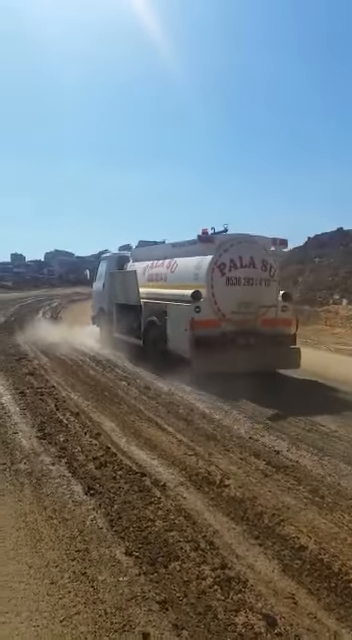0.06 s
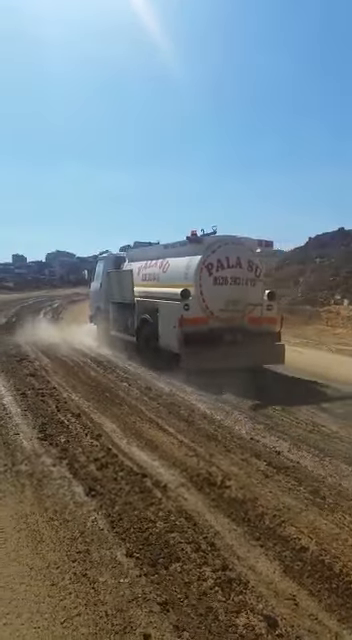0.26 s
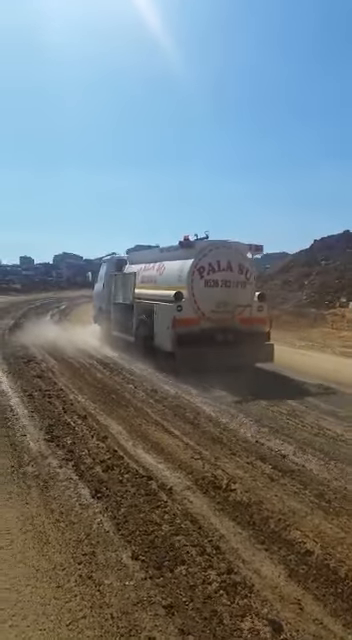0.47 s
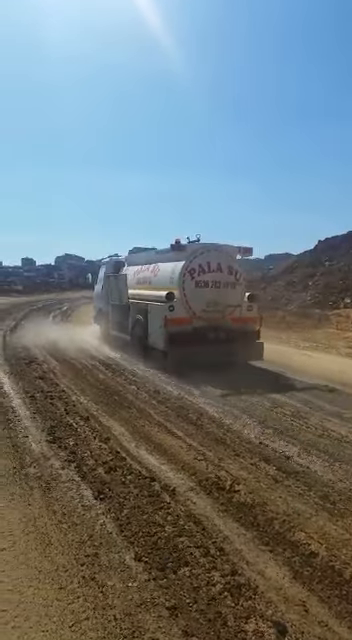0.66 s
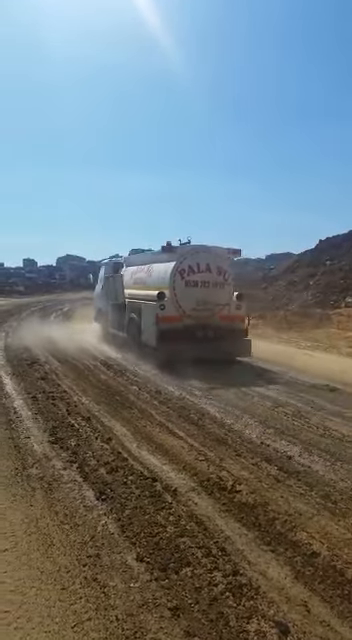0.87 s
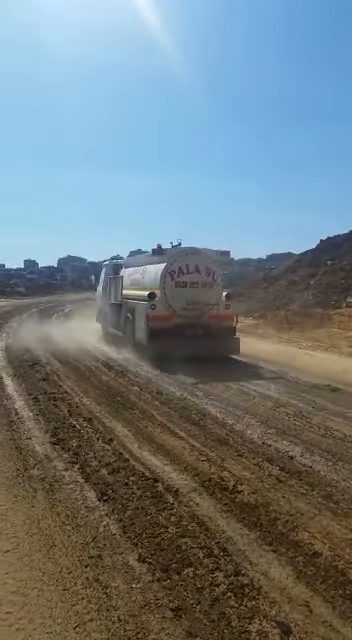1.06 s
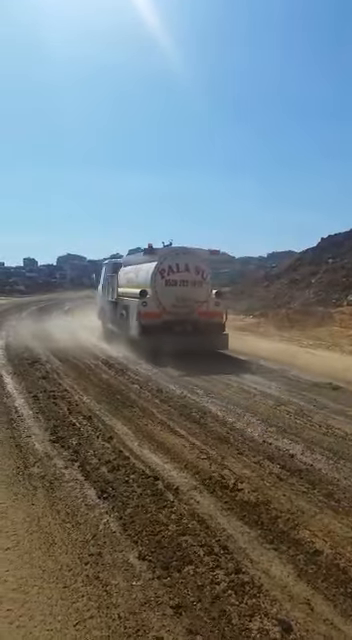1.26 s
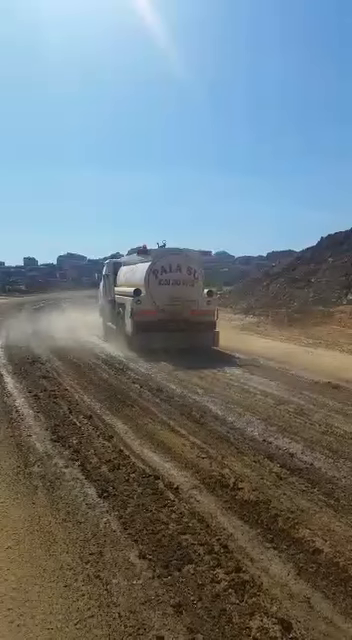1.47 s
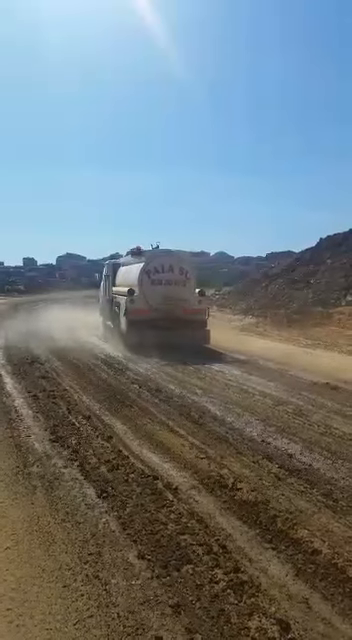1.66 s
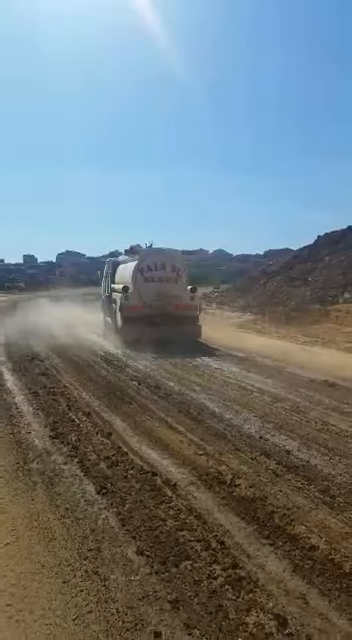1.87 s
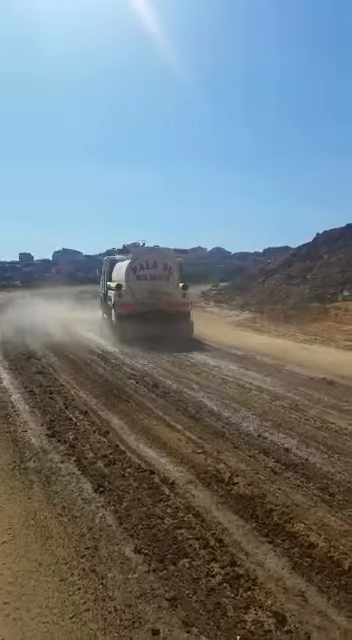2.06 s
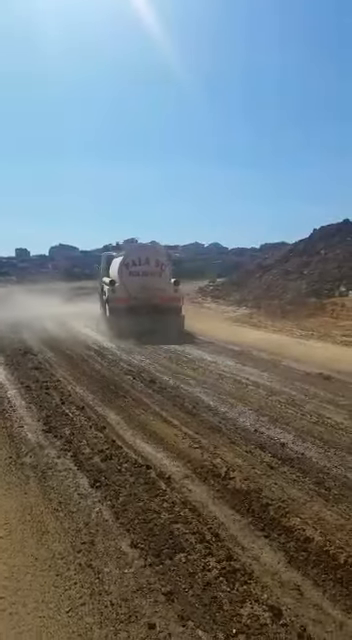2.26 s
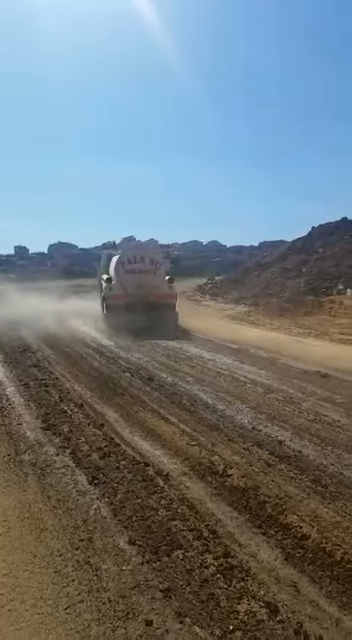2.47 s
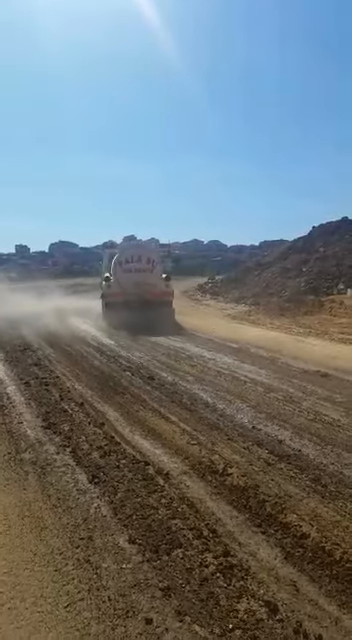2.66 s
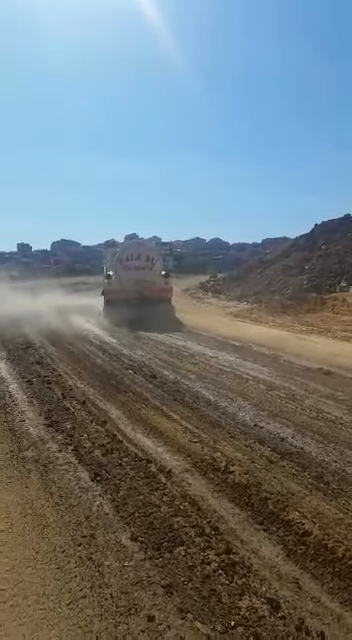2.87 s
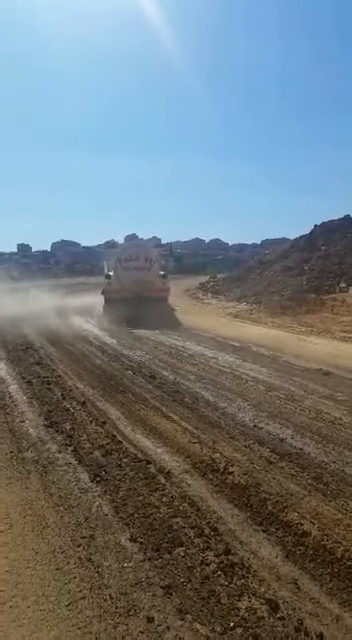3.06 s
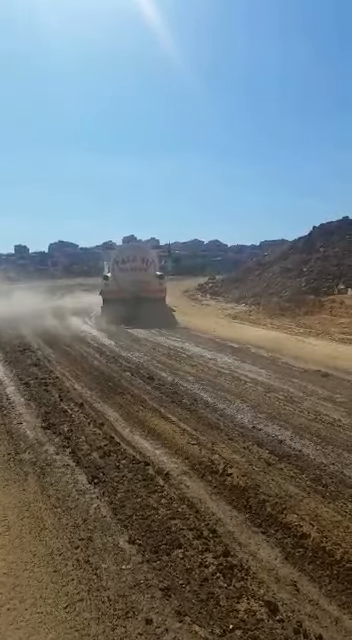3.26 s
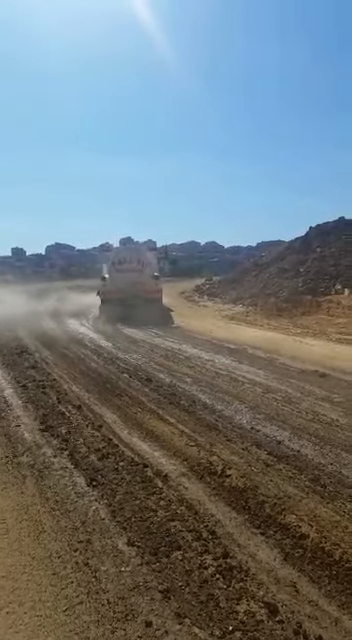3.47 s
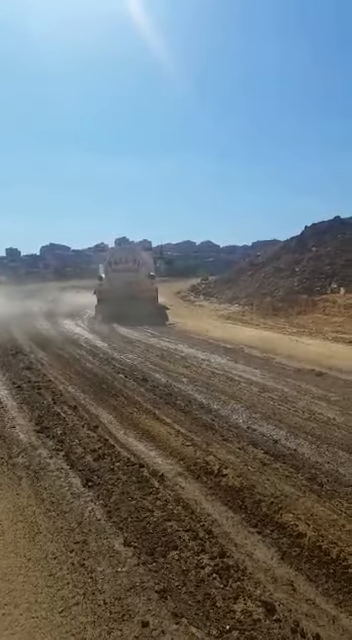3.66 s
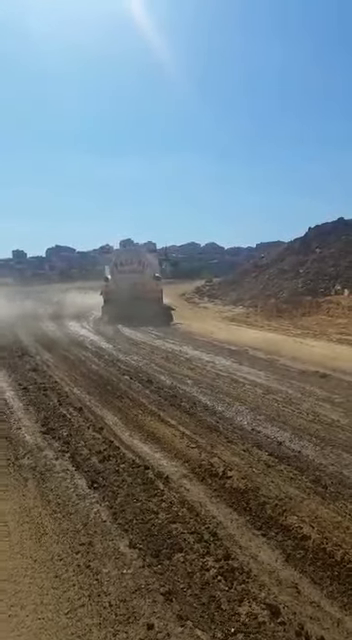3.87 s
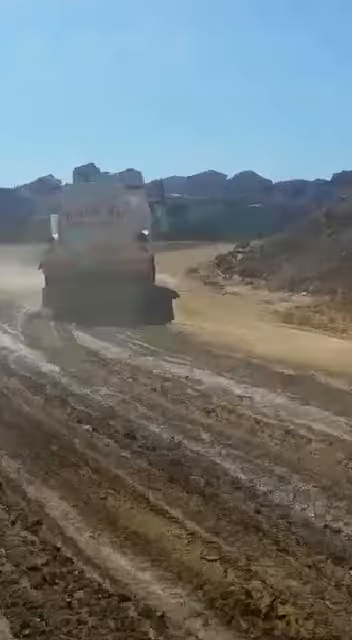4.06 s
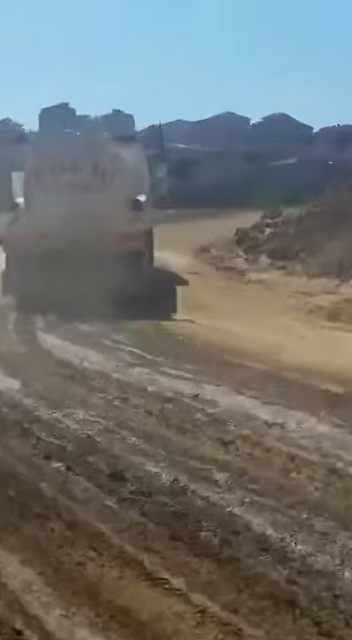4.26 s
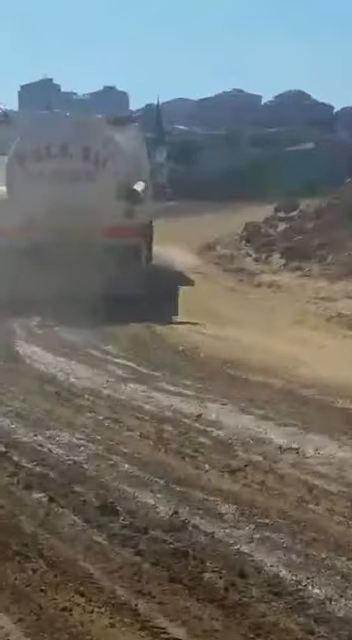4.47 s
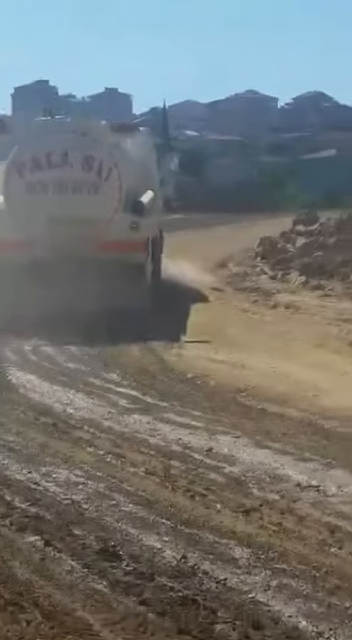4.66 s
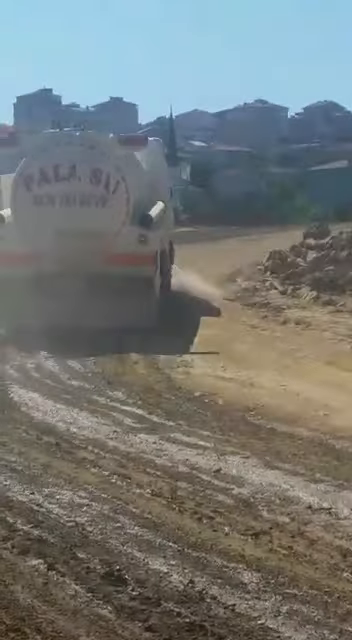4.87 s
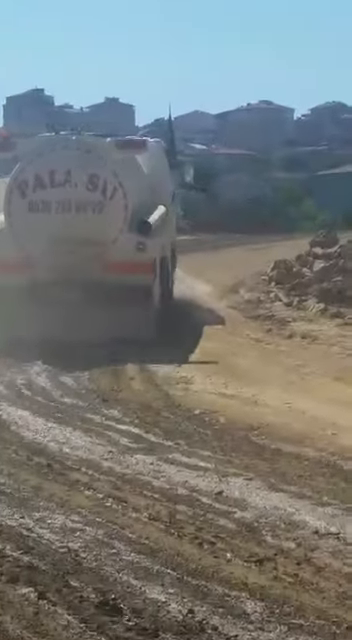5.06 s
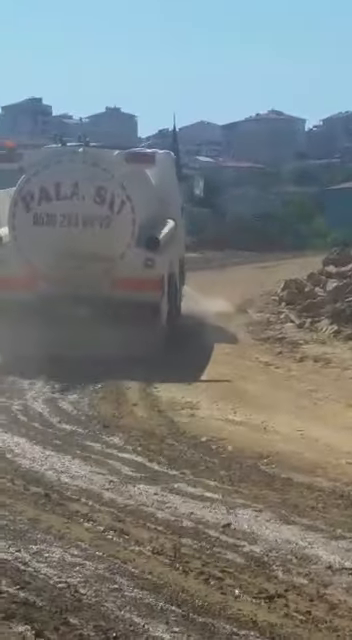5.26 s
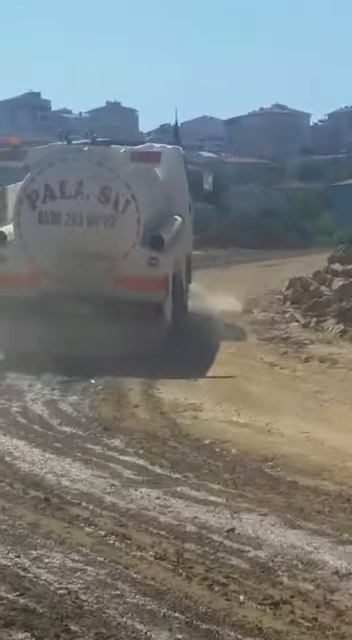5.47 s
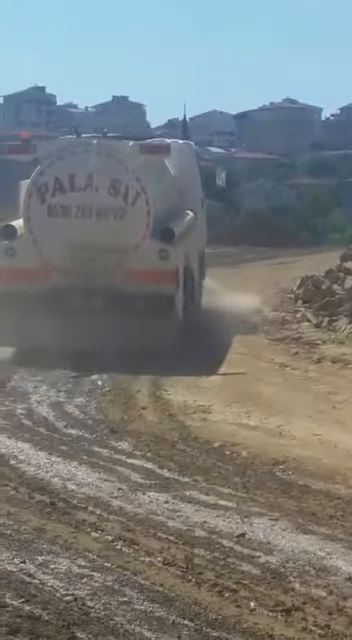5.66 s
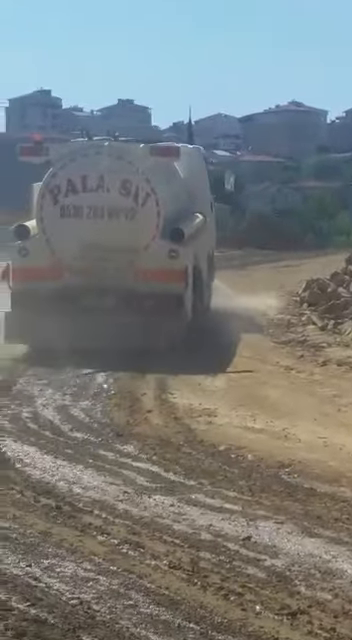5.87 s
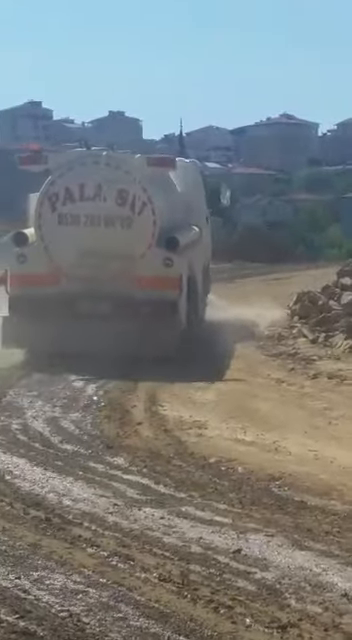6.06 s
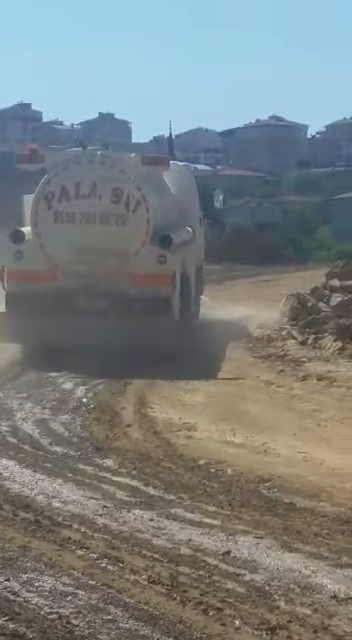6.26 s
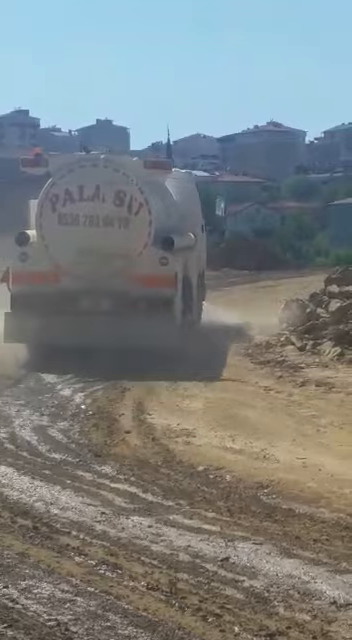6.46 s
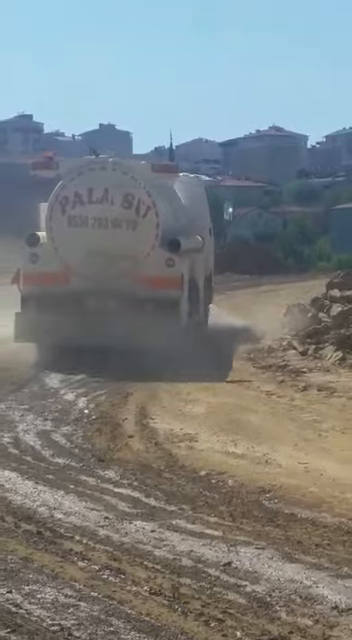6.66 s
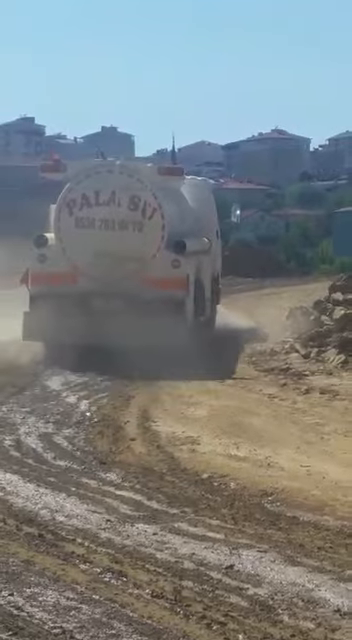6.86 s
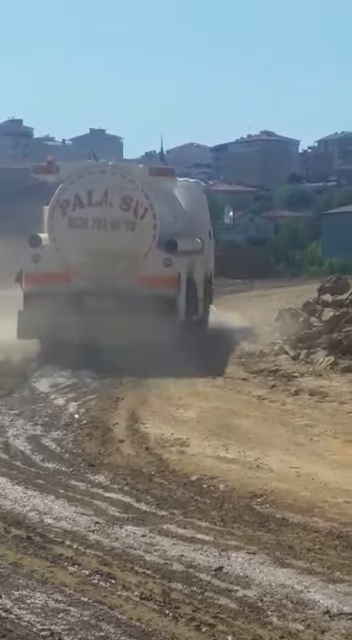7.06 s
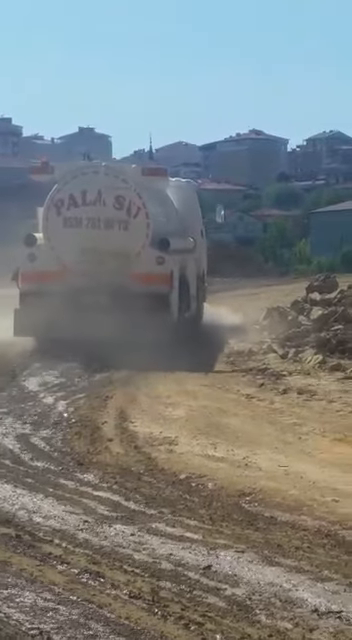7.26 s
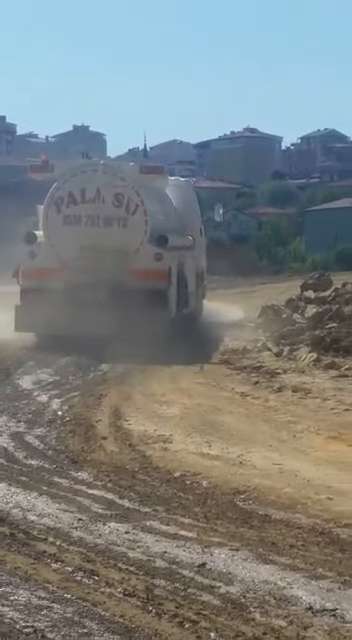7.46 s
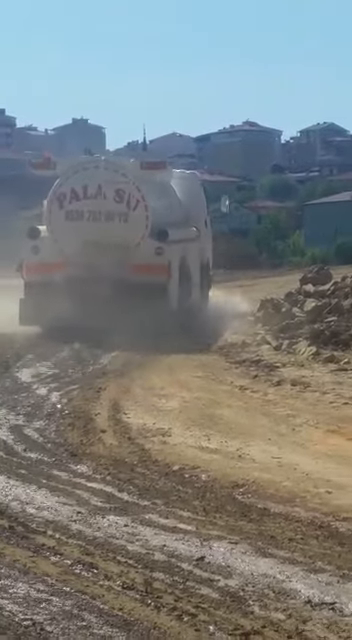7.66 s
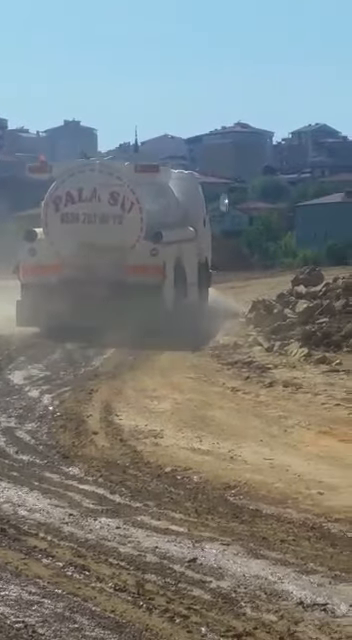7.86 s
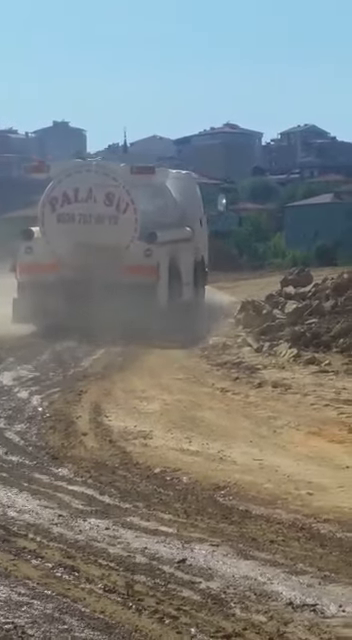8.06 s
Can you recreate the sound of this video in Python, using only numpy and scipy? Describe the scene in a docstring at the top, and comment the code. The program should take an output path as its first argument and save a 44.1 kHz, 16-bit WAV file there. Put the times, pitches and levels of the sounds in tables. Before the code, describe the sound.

A diesel water tanker starts close, with deep rumble, pulsing clatter and bright spray hissing on dirt, then drives away and grows duller. Around two seconds a loud air jet opens abruptly to one side, surges and cuts off at four. Afterwards come faint metallic engine knock, a farther machine's whine and distant site work. Open air, stereo microphone with light wind rumble and bumps.

```python
"""A diesel water tanker drives away over a dirt site: firing harmonics, pulsing clatter and ticking knock,
with spray hissing on the ground as drop-roughened noise. All of it is heard in the open air.
A heavy machine close by hums on the low harmonics of its shaft; a farther one joins in with high ones.
A valve to one side blows off a jet of surging noise for two seconds. Behind lie whirring bands and a wash
of distant work; light wind rumbles in the microphone ports and bumps them with swings of pressure."""
import sys
import numpy as np
from scipy import signal
from scipy.fft import rfft, irfft, next_fast_len
from scipy.io import wavfile
from scipy.ndimage import map_coordinates

SR = 44100
rng = np.random.default_rng(int(sys.argv[2]) if len(sys.argv) > 2 else 0)


def unload_audio(sound):
    """Save the sound as a 16-bit wav file, at the path given as the first command line argument."""
    columns = np.transpose(np.atleast_2d(sound))
    # keep every value between -1 and 1, then stretch to whole-number steps
    steps = np.round(np.clip(columns, -1, 1) * 32767)
    wavfile.write(sys.argv[1], SR, steps.astype(np.int16))


N = 358091

# Spectra, all [f/Hz, relative density/dB per Hz]; noise() sets the overall level.
# Distant work
SITE_SPECTRUM = [(300, -4), (380, -6), (440, -11), (550, -2.5), (660, -6.5), (770, -3), (870, -8.5),
                 (980, -9), (1060, -5), (1250, -8.5), (1480, -9.5), (1750, -15), (2300, -13), (2650, -20),
                 (3600, -18.5), (4200, -27), (7500, -32.5), (10000, -52), (13000, -80)]
# Air rumbling in the microphone ports
WIND_SPECTRUM = [(12, -15), (25, 0.5), (42, 0.5), (70, 1.5), (110, 1), (170, -0.5), (300, -20)]
# Blow-off jet, the ring of its nozzle and its treble fizz
JET_SPECTRUM = [(1000, -14), (1450, -8), (1900, 0.5), (2200, 6.5), (2420, 2), (2600, 4), (2950, 1),
                (3900, 0.5), (4700, 3), (5300, 8), (6100, 2), (7500, -1.5), (9000, -8.5), (12500, -24)]
NOZZLE_SPECTRUM = [(3500, -41.5), (4800, -10), (5350, 1.5), (6100, -4), (6550, -3), (7100, -2.5),
                   (7650, 0.5), (8400, -6.5), (11000, -25), (12500, -18), (14500, -35)]
FIZZ_SPECTRUM = [(6000, -12), (8700, 0.5), (10800, 1), (12700, -1), (14500, -18)]
# Bright spray nearby, and its dull spatter from afar
SPRAY_SPECTRUM = [(1200, -10), (2500, -1), (3500, 1.5), (4700, 2), (6000, 2), (7300, 4), (8500, 3.5),
                  (11000, 2), (14500, -2)]
SPLASH_SPECTRUM = [(1200, -8.5), (2300, -9), (2800, 3), (3600, 1), (4500, 0.5), (5800, 0.5), (6400, -2),
                   (7400, -6.5), (8700, -8), (10000, -27.5), (12000, -48)]
# Tanker: exhaust rumble, engine clatter, knock and the upper ring of the knock
RUMBLE_SPECTRUM = [(25, -16), (45, -8), (80, 0.5), (115, -6.5), (140, 5), (168, -1), (200, -1), (245, -6.5),
                   (280, -4.5), (320, -14), (450, -20.5), (800, -65)]
CLATTER_SPECTRUM = [(200, -3.5), (350, 1), (440, -4.5), (600, -1), (900, -5.5), (1090, -6), (1250, -3.5),
                    (1500, -4), (1900, -9), (2250, -9.5), (2700, -15), (4000, -18), (9000, -31)]
KNOCK_SPECTRUM = [(2500, -22), (2900, -9), (3250, -7), (3600, 2.5), (4000, -5), (4350, -3), (4700, -11.5),
                  (5200, -12), (6100, -13), (6600, -26), (7400, -24), (9000, -44)]
KNOCK_RING_SPECTRUM = [(3600, -20), (4400, -2), (5100, -1), (5600, -5), (6400, -24)]
# Bands that follow a pitch: gritty swish and whirr [f/pitch, relative density/dB per Hz]
SLIDE_SHAPE = [(.25, 3.5), (.6, -3), (1, -1.5), (1.35, -7.5), (2.5, -29)]
WHIRR_SHAPE = [(.7, -28), (.86, -14), (.96, -1), (1.04, -0.5), (1.16, -14)]

# Directions: ahead, to the side, and at the microphone ports
# [f/Hz, left-right likeness/1, L-R level/dB, phase lead of the left/rad]
AHEAD = [(60, 1, -6.5, 0.5), (252, 1, 1.5, 0.08), (490, 0.8, 2, 0.3), (930, 0.87, 0.5, -0.76),
         (1900, 0.79, -1.5, -0.4), (3750, 0.69, -3.5, -1), (5450, 0.53, -10, -0.5),
         (6560, 0.44, -4.5, -0.5), (8000, 0.38, -5, -2), (11200, 0.13, -10, -0.5), (13900, .3, -14.5, -2)]
ASIDE = [(980, 0.65, 1, 7), (2320, 0.89, 11, 0.76), (3220, .1, 9.5, -2.5), (3900, 0.9, 8, -1.54),
         (5060, 1, 2.5, -2.5), (5870, 0.7, 0, -3), (7230, 0.73, 9.5, -4.5), (8040, 0.42, 4.5, -3.5),
         (9350, 0.32, 3.5, -5), (12300, .3, 1.5, -4), (14500, .2, -13, -18)]
PORTS = [(20, .2, 0, 0), (200, .2, 0, 0)]
# Lags of two ground reflections [lag/s]
ECHO_LAGS_S = (0.001815, .0037)

# Gritty swishes from the site [start t/s, length/s, level/dB, pitch f/Hz]
SLIDES = [(4.435, 0.13, -31.5, 1000), (5.131, 0.082, -29.3, 880)]
# Gusts over the breeze [start t/s, length/s, level before a common trim/dB, L-R level/dB]
GUSTS = [(.72, .28, -21.5, -2), (1.18, 0.11, -29, -4), (1.85, 0.07, -25, -16), (2.142, .1, -27, -1),
         (2.604, 0.1, -22.5, -14), (2.896, .25, -24, -1), (3.34, 0.27, -29.5, -12),
         (4.45, 1.51, -26.5, -12), (6.41, 0.16, -24, 1)]
# Bumps of air on the microphone [t/s, height/dB, pitch f/Hz, L-R level/dB, length/cycles]
BUMPS = [(2.655, -22, 75, -18, 2), (2.93, -17, 75, 22, 1.7), (3.094, -20.5, 65, -21, 1.5),
         (4.364, -15, 70.4, -24, .9), (4.993, -20, 65, -18, 1), (5.053, -22, 60, -18, 1),
         (5.271, -19, 75, -10, 1.3), (5.33, -24, 60, -14, 1.3), (5.511, -23, 60.2, -14, 1.3),
         (5.709, -22, 90, 20, 1), (5.765, -20, 55, -14, 2), (5.855, -18.5, 105, 23, 1),
         (5.903, -23, 90, 18, 1.5), (6.42, -18, 75, 12, 2), (6.448, -11.5, 93, 14, 2.1),
         (6.5, -17.5, 100, -10, 3.5), (7.061, -12, 70, -15, 1.2)]
# Narrow, unsteady whirrs [start t/s, length/s, level/dB, pitch f/Hz]
WHIRRS = [(-.3, 2.46, -42.5, 1064), (2.34, 2, -47, 1090), (.8, 1.42, -42, 557), (2.2, 0.56, -43, 390),
          (2.8, 1.6, -48, 769.6), (3.5, 1.0, -46, 1440)]

# Harmonics of the near and the far machine [multiple of shaft rate/1, relative level/dB]
MACHINE_ORDERS = [(2, -36), (4, -37.5), (6, -37.5), (8, -35), (9, -26.5), (11, -46.5), (12, -44),
                  (14, -55.5), (15, -47.5), (17, -53.5), (19, -54), (21, -51), (24, -49.5)]
WHINE_ORDERS = [(4, -37), (13, -49.5), (16, -50), (18, -56), (22, -52.5), (23, -53), (24, -56), (30, -51.5),
                (31, -51), (32, -60), (34, -47.5), (35, -53.5), (37, -55.5), (40, -50), (41, -55),
                (43, -56), (45, -56), (46, -60.5), (50, -60), (66, -66)]
# Fifth order of the near machine [t/s, level/dB]
DRONE_LEVEL = [(0, -21), (2.2, -27.5), (4.5, -33.5), (8.12, -33.5)]
# Surges of the jet [t/s, nozzle ring level/dB, fizz level/dB]
JET_SURGES = [(2.11, -40.5, -37.5), (2.5, -34.5, -40), (2.66, -45, -47), (2.8, -52, -47),
              (2.95, -42, -41.5), (3.3, -39, -45.5), (3.42, -32.5, -41), (3.53, -36.5, -43.5),
              (3.66, -30.5, -41.5), (3.77, -37, -41.5), (3.89, -32.5, -47), (4.08, -38, -42)]

# Swells of the bright spray [start t/s, length/s, level/dB]
SPRAY_SWELLS = [(.78, 0.38, -35), (1.25, 0.47, -41.5), (4.35, 0.87, -60), (6.65, 0.62, -64.5)]
# Far spatter [t/s, relative level/dB]
SPLASH_LEVEL = [(4.3, -55), (6.99, -57), (7.17, -65.5), (7.9, -63.5)]

# Mean firing rate of the tanker engine [t/s, f/Hz]
FIRING_RATE = [(0, 66.37), (.8, 67.8), (1.5, 69.75), (3.8, 68.88), (4.4, 70.8), (5.2, 70.96), (5.6, 69.0),
               (6.4, 68.44), (7.5, 67.6), (8.12, 70.2)]
# Firing note: its harmonics [multiple of firing rate/1, relative level/dB] and strength [t/s, level/dB]
EXHAUST_ORDERS = [(1, -0.5), (2, -8.5), (3, -16), (4, -19.5)]
NOTE_LEVEL = [(0, -23.5), (1.4, -27.5), (2.3, -27), (3, -25.5), (3.9, -28), (4.35, -26), (5.6, -31),
              (6.1, -27), (8.12, -28.5)]
# Knock of each cylinder in firing order [relative level/dB]
CYLINDER_DB = [1.5, -1, 0, -1]
# The knock comes through as the tanker turns [t/s, level/dB]
KNOCK_LEVEL = [(4.3, -62), (4.44, -53), (4.58, -51), (4.72, -57.5), (5.3, -54), (5.75, -49.5), (5.9, -52.5),
               (6.15, -48.5), (6.65, -55), (7.05, -57), (7.5, -67), (8.12, -60)]
# Swells of the upper ring [start t/s, length/s, level/dB]
RING_SWELLS = [(5.5, .3, -59), (5.99, .2, -53.5)]
# Upward sweeps of the knock's ring [start t/s, length/s, level/dB, first f/Hz, last f/Hz]
SWEEPS = [(4.385, .1, -49, 2750, 3750), (4.46, .17, -48.5, 3480, 4010), (5.478, .13, -56, 3900, 5240),
          (5.64, .16, -52, 2850, 3750)]

MIC_LOW_HZ, CUTOFF_HZ = 22.0, 14600
BREEZE_DB, GUST_EDGE_S = -42, 0.11
SHAFT_HZ, WHINE_HZ = 25.21, 24.66   # turns per second of the near and the far machine
WHINE_START_S, WHINE_RISE_S = 4.17, 0.97
VALVE_OPEN_S, VALVE_LENGTH_S, VALVE_EDGE_S = 2.111, 1.975, 0.016
JET_DB, JET_SAG_DB_PER_S = -31.5, 1.5   # the jet sags as the pressure drops
FALTER_S, FALTER_HALF_S, FALTER_HISS_DB = 2.67, 0.18, 1.5
BURST_DB, BURST_DECAY_S = 2, 0.05   # the first rush of air is stronger
LEAK_DB, LEAK_FADE_DB_PER_S = -46, 48
START_M, SPEED_M_PER_S = 7.7, 3.73   # distance of the tanker at first, and its steady speed away
GROWL_START_S, GROWL_LENGTH_S, GROWL_DB, GROWL_TOP_HZ = 0.61, 1.97, -36, 700   # the engine labours
CYCLE_SHARE = .55   # share of the clatter's power that repeats with every engine cycle
KNOCK_DECAY_S, KNOCK_SPREAD_DB = .0016, 1.4   # length of a tick; chance in its strength
SWEEP_WIDTH_HZ = 240
SIDES = np.array([[1], [-1]])   # left, right


def from_db(db):
    """Decibels to amplitude gain."""
    return 10 ** (np.asarray(db) / 20)


def rms_one(x):
    """Scale to unit power."""
    return x / np.sqrt(np.mean(x ** 2) + 1e-20)


def seconds():
    """The time of each sample."""
    return np.arange(N) / SR


def in_time(rows):
    """One curve per column, a value for each sample."""
    s, *columns = np.transpose(rows)
    return [np.interp(seconds(), s, c) for c in columns]


def at_hz(rows, hz):
    """Each column read on a log-frequency axis."""
    points, *columns = np.transpose(rows)
    return [np.interp(np.log(hz + 1), np.log(points), c) for c in columns]


def bell(s, half_s):
    """A smooth rise and fall of height 1."""
    return np.exp(-.5 * ((seconds() - s) / half_s) ** 2)


def held(start_s, length_s, edge_s):
    """Attack, hold and release; the edges are centred on start and end."""
    t = seconds() - start_s
    return np.clip(.5 + np.minimum(t, length_s - t) / edge_s, 0, 1)


def swells(rows, edge_s):
    """Gain of held events, summed in power."""
    return np.sqrt(sum((from_db(db) * held(s, length, edge_s)) ** 2 for s, length, db in rows))


def fading(start_db, db_per_s, after_s=0):
    """Gain that holds, then sinks evenly in dB."""
    return from_db(start_db - db_per_s * np.maximum(seconds() - after_s, 0))


def receding(start_db, db_per_doubling=0, db_per_m=0):
    """Gain of a tanker sound: it spreads with distance, and the ground swallows its treble by the metre."""
    driven_m = SPEED_M_PER_S * seconds()
    spreading_db = db_per_doubling * np.log2(1 + driven_m / START_M)
    return from_db(start_db - spreading_db - db_per_m * driven_m)


def drift(rate):
    """Chance of spread 1: noise at every 40th sample, low-passed by a double pole at rate/Hz."""
    r = np.exp(-80 * np.pi * rate / SR)
    settled = 2000
    white = rng.standard_normal(N // 40 + 2 + settled)
    slow = signal.lfilter([1], [1, -2 * r, r * r], white)[settled:]
    return np.interp(np.arange(N) / 40, np.arange(len(slow)), rms_one(slow))


def angle(hz):
    """Phase of something turning at this rate, from a random start."""
    return 2 * np.pi * (np.cumsum(hz) / SR + rng.random())


def noise(spectrum, direction, ripple_db=0):
    """Stereo noise from one direction, rms 1, its spectrum rippled by two reflections."""
    size = next_fast_len(N)
    hz = np.fft.rfftfreq(size, 1 / SR)
    alike, pan_db, lead = at_hz(direction, hz)
    alike = np.clip(alike, 0, .995)
    mid, side = rfft(rng.standard_normal((2, size)))
    pair = np.sqrt(1 + alike) * mid + np.sqrt(1 - alike) * side * SIDES
    ripple = sum(np.cos(2 * np.pi * hz * lag) for lag in ECHO_LAGS_S)
    fall = np.maximum(1, hz / spectrum[-1][0]) ** -4   # steep slope past the last point
    colour = fall * from_db(at_hz(spectrum, hz)[0] + ripple_db * ripple + SIDES * pan_db / 2)
    return rms_one(irfft(pair * colour * np.exp(.5j * SIDES * lead), size)[:, :N])


def lines(turn, orders, waver_db, wobble):
    """Harmonics of a shaft; each wavers in level and phase (wobble/rad) on its way through the air."""
    total = 0
    for k, db in orders:
        level = from_db(db + waver_db * drift(2.16))
        phase = round(k) * turn + wobble * drift(1.84) + 2 * np.pi * rng.random()
        total = total + level * np.sin(phase)
    return np.sqrt(2) * total


def wandering(x, share, per_s):
    """The pitch of a sound strays by a small share, at random, as its time axis is warped."""
    place = np.arange(N) + np.cumsum(share * drift(per_s))
    return np.array([map_coordinates(channel, [place], order=3, mode="mirror") for channel in x])


def wind():
    """Lumpy rumble at the ports comes in gusts; each bump is a swing or a few of pressure."""
    flow = from_db(BREEZE_DB)
    for s, length, db, pan_db in GUSTS:
        flow = flow + from_db(db - 3.0 + SIDES * pan_db / 2) * held(s, length, GUST_EDGE_S)
    bumps = 0
    for s, db, hz, pan_db, cycles in BUMPS:
        swing = 2 * np.pi * hz * (seconds() - s)
        envelope = np.exp(-np.minimum((swing / (np.pi * cycles)) ** 2, 20))
        bumps = bumps + from_db(db + SIDES * pan_db / 2) * np.sin(swing) * envelope
    return bumps + flow * from_db(1.6 * drift(14)) * noise(WIND_SPECTRUM, PORTS)


def site():
    """A wash of distant work, busier for a while, with short, rough swishes like sliding earth."""
    wash_db = -37.8 + 2.0 * held(4.9, 2.47, edge_s=0.72)
    total = from_db(wash_db + .5 * drift(2.2)) * noise(SITE_SPECTRUM, AHEAD, ripple_db=0.33)
    for s, length, db, hz in SLIDES:
        gain = from_db(db + .9 * drift(60)) * held(s, length, edge_s=.05)
        total = total + gain * noise(np.array(SLIDE_SHAPE) * [hz, 1], AHEAD)
    return total


def whirrs():
    """Narrow bands of machine noise swell and break up."""
    total = 0
    for s, length, db, hz in WHIRRS:
        gain = from_db(db + 1.65 * drift(7.7)) * held(s, length, edge_s=0.31)
        total = total + gain * noise(np.array(WHIRR_SHAPE) * [hz, 1], AHEAD)
    return total


def machines(turn):
    """The near machine hums on low orders of its shaft; the far one whines on high orders."""
    hum_gain = fading(1.7, db_per_s=1.17, after_s=1.27) * from_db(-1.8 * bell(0, 0.6))
    hum = hum_gain * lines(turn, MACHINE_ORDERS, waver_db=0.9, wobble=0.055)
    drone = from_db(in_time(DRONE_LEVEL)[0]) * lines(turn, [(5, 0)], waver_db=0.5, wobble=0.058)
    joining = np.clip((seconds() - WHINE_START_S) / WHINE_RISE_S, 0, 1)
    far_turn = angle(np.full(N, WHINE_HZ))
    whine = from_db(-.2) * joining * lines(far_turn, WHINE_ORDERS, waver_db=.6, wobble=.05)
    return (hum + whine) * from_db(SIDES * .5) + drone


def valve():
    """The jet opens and shuts abruptly, with surging fizz and a straying nozzle ring; a thin leak dies away."""
    open_s = seconds() - VALVE_OPEN_S
    ring_db, fizz_db = in_time(JET_SURGES)
    sag_db = JET_SAG_DB_PER_S * open_s
    falter_db = FALTER_HISS_DB * bell(FALTER_S, FALTER_HALF_S)
    burst_db = BURST_DB * np.exp(-np.abs(open_s) / BURST_DECAY_S)
    hiss_db = JET_DB - sag_db - falter_db + burst_db
    hiss = from_db(hiss_db + .5 * drift(20)) * noise(JET_SPECTRUM, ASIDE, ripple_db=.7)
    nozzle = wandering(noise(NOZZLE_SPECTRUM, ASIDE), share=.022, per_s=3)
    ring = from_db(ring_db + 1.0 * drift(25)) * nozzle
    fizz = from_db(fizz_db + .7 * drift(20)) * noise(FIZZ_SPECTRUM, ASIDE, ripple_db=1.0)
    leak_gain = (open_s > 0) * fading(LEAK_DB, LEAK_FADE_DB_PER_S, VALVE_OPEN_S + VALVE_LENGTH_S)
    leak = leak_gain * (noise(SPRAY_SPECTRUM, ASIDE) + 0.92 * nozzle)
    opening = held(VALVE_OPEN_S, VALVE_LENGTH_S, VALVE_EDGE_S)
    return opening * (hiss + ring + fizz) + (1 - opening) * leak


def spray(turn):
    """Bright hiss, rough with drops, throbs at the near machine's shaft rate; a dull spatter is added."""
    bright = np.hypot(receding(-30.0, db_per_m=2.0), swells(SPRAY_SWELLS, edge_s=0.25))
    throb = 1 + 0.16 * np.cos(turn)
    drops = from_db(0.44 * drift(7.1) + 0.84 * drift(160))
    hiss = bright * drops * throb * noise(SPRAY_SPECTRUM, AHEAD)
    splash_db = in_time(SPLASH_LEVEL)[0] + 5.5
    splash_gain = from_db(splash_db + .5 * drift(9.6) + 2.0 * drift(99))
    return hiss + splash_gain * noise(SPLASH_SPECTRUM, AHEAD, ripple_db=0.5)


def sweeps():
    """Narrow bands of noise that rise in pitch: slow complex noise on a gliding carrier."""
    rising = 0
    for s, length, db, first_hz, last_hz in SWEEPS:
        band = drift(SWEEP_WIDTH_HZ) + 1j * drift(SWEEP_WIDTH_HZ)
        glide = angle(np.interp(seconds(), [s, s + length], [first_hz, last_hz]))
        rising = rising + from_db(db) * held(s, length, edge_s=.04) * band * np.exp(1j * glide)
    return np.real(rising) * from_db(SIDES * -1.5)


def knock(fire):
    """Each firing gives a soft-edged metallic tick, its strength set by cylinder; some ring or sweep up."""
    at = np.flatnonzero(np.diff(fire // (2 * np.pi)))
    chance_db = KNOCK_SPREAD_DB * np.clip(rng.standard_normal(len(at)), -2, 2)
    sizes = from_db(np.resize(CYLINDER_DB, len(at)) + chance_db)
    r = np.exp(-1 / (KNOCK_DECAY_S * SR))
    impulses = np.bincount(at, sizes, N) + 1e-18
    ticks = rms_one(signal.lfilter([1], [1, -2 * r, r * r], impulses))
    block = from_db(in_time(KNOCK_LEVEL)[0]) * noise(KNOCK_SPECTRUM, AHEAD, ripple_db=1.2)
    ring = swells(RING_SWELLS, edge_s=.1) * noise(KNOCK_RING_SPECTRUM, AHEAD)
    return ticks * (block + ring) + np.sqrt(np.abs(ticks)) * sweeps()


def cycling(fire, spectrum, change_per_s):
    """A rattle repeating each engine cycle gives close lines; its pattern slowly changes. Rms 1."""
    size, firings = 4096, len(CYLINDER_DB)   # samples and firings in one cycle
    hz = np.arange(size // 2 + 1) * np.mean(FIRING_RATE, axis=0)[1] / firings
    _, pan_db, lead = at_hz(AHEAD, hz)
    inside = (hz > spectrum[0][0]) * (hz < spectrum[-1][0])
    colour = inside * from_db(at_hz(spectrum, hz)[0] + SIDES * pan_db / 2) * np.exp(.5j * SIDES * lead)
    place = size * fire / (2 * np.pi * firings)
    patterns = irfft(colour * rfft(rng.standard_normal((4, 1, size))))
    shares = np.array([drift(change_per_s) for _ in patterns])
    shares = shares / np.linalg.norm(shares, axis=0)   # constant power in the mix
    total = 0
    for share, pattern in zip(shares, patterns):
        played = [np.interp(place, np.arange(size), side, period=size) for side in pattern]
        total = total + share * np.array(played)
    return rms_one(total)


def tanker():
    """Firing note, rumble, gear whine and knock, with clatter that pulses per firing and growls under load."""
    fire = angle(in_time(FIRING_RATE)[0] * (1 + 0.003877 * drift(3.03)))
    note = from_db(in_time(NOTE_LEVEL)[0]) * lines(fire, EXHAUST_ORDERS, waver_db=1.0, wobble=0.093)
    gear_orders = [(6, -7.0), (8, -1.5), (16, -0.5)]   # multiple of firing rate, relative level/dB
    gears = receding(-39.5, db_per_doubling=9.0) * lines(fire, gear_orders, waver_db=2.0, wobble=1.76)
    rumble = receding(-22.4, db_per_doubling=4.0) * noise(RUMBLE_SPECTRUM, AHEAD) * (1 + 0.16 * np.cos(fire))
    repeating = np.sqrt(CYCLE_SHARE) * cycling(fire, CLATTER_SPECTRUM, change_per_s=0.74)
    irregular = np.sqrt(1 - CYCLE_SHARE) * noise(CLATTER_SPECTRUM, AHEAD, ripple_db=0.4)
    clatter = receding(-25.0, db_per_m=1.07) * from_db(.5 * drift(17)) * (repeating + irregular)
    low_pass = signal.butter(3, GROWL_TOP_HZ, fs=SR, output="sos")
    dull = signal.sosfilt(low_pass, noise(CLATTER_SPECTRUM, AHEAD))
    growl = from_db(GROWL_DB) * held(GROWL_START_S, GROWL_LENGTH_S, edge_s=0.1) * dull
    pulsing = 1 + 0.098 * np.cos(fire) + 0.1 * np.cos(2 * fire)
    return note * from_db(SIDES * -.3) + gears + rumble + (clatter + growl) * pulsing + knock(fire)


def scene():
    """All sources in the open air."""
    turn = angle(np.full(N, SHAFT_HZ))   # near machine's shaft
    return tanker() + whirrs() + spray(turn) + machines(turn) + valve() + site() + wind()


def record(dry):
    """The microphone loses the deepest bass, and the top is cut steeply."""
    high_pass = signal.butter(2, MIC_LOW_HZ, "high", fs=SR, output="sos")
    top_cut = signal.ellip(12, .1, 90, CUTOFF_HZ, fs=SR, output="sos")
    return signal.sosfilt(top_cut, signal.sosfilt(high_pass, dry))


dry = scene()
out = record(dry)
unload_audio(out)
```